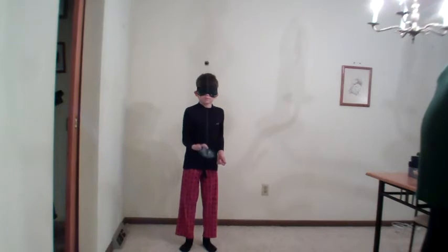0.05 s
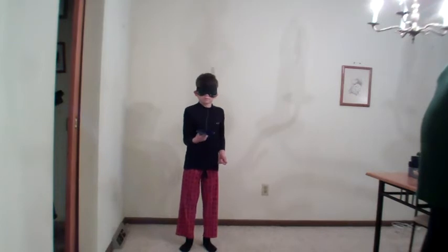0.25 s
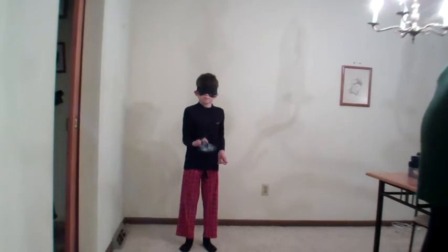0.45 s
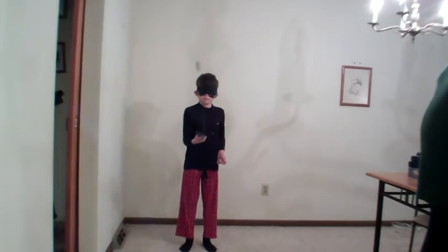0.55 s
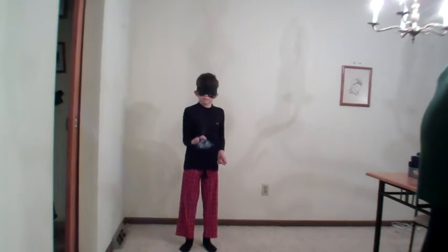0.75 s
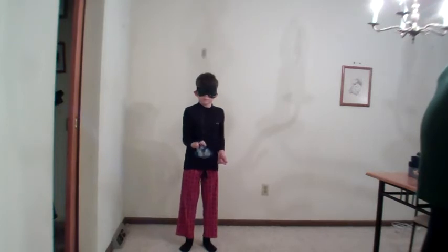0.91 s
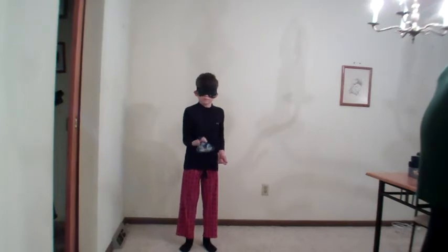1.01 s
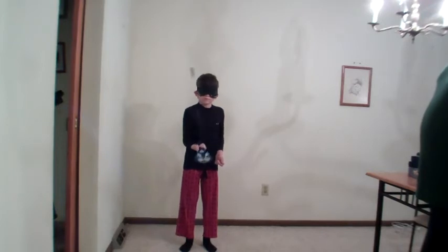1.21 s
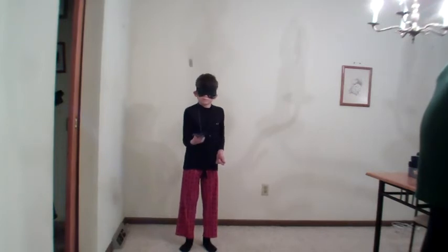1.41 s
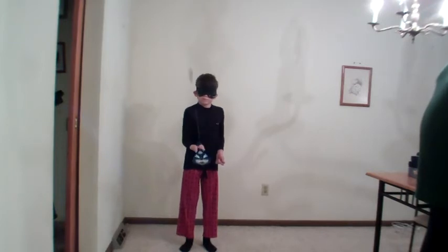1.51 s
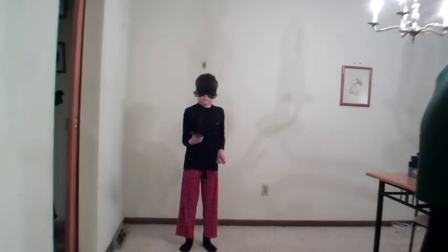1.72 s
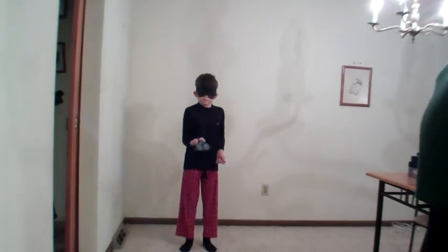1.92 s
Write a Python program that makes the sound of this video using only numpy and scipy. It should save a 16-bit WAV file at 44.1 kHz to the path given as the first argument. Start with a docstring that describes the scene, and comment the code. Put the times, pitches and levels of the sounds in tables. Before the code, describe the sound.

A wooden paddle bats a small rubber ball on an elastic six times in a quick, even rhythm. Each sharp knock follows a faint swish and echoes briefly in a quiet, bare room, heard from a few metres away.

```python
"""Paddle ball in a bare room

A few metres away, a wooden paddle bats a small rubber ball on an elastic up again and again.
Each knock is a sharp click plus a short ring of the blade; nearby surfaces echo it and the room rings on.
Paddle and elastic swish softly through the air ahead of every blow, over faint room noise."""
import sys
import numpy as np
from scipy import signal
from scipy.fft import rfft, irfft
from scipy.io import wavfile

SR = 44100
rng = np.random.default_rng(int(sys.argv[2]) if len(sys.argv) > 2 else 0)


def put_to_file(sound):
    """Save the sound as 16-bit audio at rate SR, in the file named by the first command-line argument."""
    columns = np.atleast_2d(sound).T  # one column per channel
    safe = np.clip(columns, -1, 1)
    whole_steps = np.round(safe * 32767)
    wavfile.write(sys.argv[1], SR, whole_steps.astype(np.int16))


N = 85995
SIZE = 92160  # samples behind each spectrum: the scene plus some spare
FREQ = np.arange(SIZE // 2 + 1) * SR / SIZE
TIME = np.arange(N) / SR

# The tone of the ball touching wood. Each row: frequency in Hz, relative level in dB.
CLICK_TONE = [(60, -35), (200, -21.5), (520, -6.5), (800, -17.5), (1400, -9.5), (2150, -9.5), (3100, -6),
              (4500, -6), (7000, -7), (10000, -7.5), (11500, -16.5), (13000, -28), (14300, -41),
              (15800, -49)]


def knocks():
    """One spectrum per blow: the ball clicks, rings the blade and pushes a little air in a low thump."""
    # Each row: start in seconds, click, ring and thump levels in dB, brightness in dB per octave,
    # pitch ratio of the ring, then pitch in Hz and level in dB of the crack (a high ring set by the spot hit).
    blows = [(0.2351, -7, 5.5, -35, 0.3, 0.982, 5100, -12), (0.515, -3.5, 0.5, -8, -0.65, 1.01, 3050, -12),
             (0.7948, -2.5, -4.5, -24, 0.45, 1.015, 2555, -5),
             (1.07915, -3, -3.5, -16.5, 1.3, 1.01, 5650, -9), (1.3723, 1, -4, -21, -1.2, 0.963, 4190, -1.5),
             (1.657, -3, -1.5, -8, -0.3, 1, 4640, -5.5)]
    # The blade's own notes. Each row: base pitch in Hz, level in dB, seconds to fade by 60 dB.
    blade_notes = [(432, -29, 0.046), (573, 3, 0.016), (1004, -4, 0.018), (1225, 1, 0.015),
                   (1457, -3.5, 0.022), (1592, -5, 0.033), (2800, -23.5, 0.012), (3740, -17.5, 0.0092)]
    crack_fade_s, thump_hz, thump_fade_s, ring_top_hz = 0.01, 139, 0.0053, 9900
    click = curve(CLICK_TONE)
    octaves = np.log2(np.maximum(FREQ, 1000) / 4000)
    spreads_db = 1.2 * rng.standard_normal((len(blows), len(blade_notes)))  # no two blows ring alike
    spectra = []
    for blow, spread_db in zip(blows, spreads_db):
        start, click_db, ring_db, thump_db, tilt_db, pitch, crack_hz, crack_db = blow
        notes = [(hz, db + ring_db + extra, t60) for (hz, db, t60), extra in zip(blade_notes, spread_db)]
        ring = ringing(notes, pitch)
        ring += ringing([(crack_hz, crack_db, crack_fade_s), (thump_hz, thump_db, thump_fade_s)])
        ring /= 1 + (FREQ / ring_top_hz) ** 16  # the blade gives off little above this
        contact = sharp_filter(click + click_db + tilt_db * octaves)
        spectra.append((contact + ring) * delay(start))
    return spectra


def room_echoes(count):
    """The room's answer to each blow: fixed echoes and rings, plus a wash that changes as the paddle moves."""
    # The direct sound and first echoes. Each row: delay in ms, left and right levels in dB,
    # extra delay on the right in ms.
    paths = [(0, 1, 0.5, 0.0033), (.68, 0.5, 1, 0.025), (3.68, -.5, -1.5, 0.0087), (4.15, -6, -8.5, 0.015),
             (8.8, -8.5, -17, 0.03)]
    # The room's own notes. Each row: pitch in Hz, level in dB, seconds to fade by 60 dB.
    room_notes = [(292.3, -3.5, 0.66), (400.7, 11.5, 0.22), (501, 1.5, 0.72), (620, -7, 0.66),
                  (1128, -7, 0.5), (1255, 8.5, 0.2), (1407, 3, 0.45), (1523, 11.5, 0.057)]
    # The wash of late echoes. Each row: frequency in Hz, level in dB, seconds to fade by 60 dB,
    # how alike left and right are from 0 to 1.
    wash_bands = [(81.4, -16.5, 0.39, 1), (250, 8, 0.2, 1), (500, -2.5, 0.23, 0.92), (830, -3.5, 0.3, 0.97),
                  (1210, 2, 0.26, 0.78), (2200, -1, 0.29, 0.54), (5100, -2.5, 0.29, 0.3),
                  (9000, -4.5, 0.24, 0.1), (13100, -11, 0.23, 0.15)]
    build_s, tail_samples = 0.0046, 16384
    scatter_db, scatter_above_hz = 1, 1050  # furniture close by scatters only the treble
    early = sum(np.array([undb(left_db) * delay(ms / 1000), undb(right_db) * delay((ms + lag) / 1000)])
                for ms, left_db, right_db, lag in paths)
    steady = early + ringing(room_notes) * delay(build_s)
    alike = curve(wash_bands, column=3)
    treble = FREQ ** 2 / (FREQ ** 2 + scatter_above_hz ** 2)
    scatter = irfft(noise_pair(alike) * treble) * undb(scatter_db)
    wash = noise_pair(alike) * undb(curve(wash_bands))
    bands = []
    for hz, _, t60, _ in wash_bands:
        this_band = curve([(row[0], row[0] == hz) for row in wash_bands])
        bands.append((irfft(wash * this_band), fade(tail_samples, t60, build_s)))
    answers = []
    for start in rng.integers(0, SIZE - tail_samples, count):
        part = slice(start, start + tail_samples)
        near = scatter[:, part] * fade(tail_samples, t60=0.043, build_s=0.002)
        tail = sum(band[:, part] * envelope for band, envelope in bands)
        answers.append(steady + rfft(near, SIZE) + rfft(tail, SIZE) * delay(build_s))
    return answers


def grazes():
    """A thin zip as ball or elastic brushes the blade just before a blow."""
    # Each row: start in seconds, peak level in dB.
    brushes = [(0.2321, -30.5), (0.511, -53)]
    pitch_hz, width_hz, rise_s, fall_s = 4950, 600, 0.0004, 0.0036
    zip_noise = noise(hump_db(pitch_hz, width_hz) / 2 + curve(CLICK_TONE))
    return zip_noise * sum(undb(db) * swell(start + rise_s, rise_s, fall_s) for start, db in brushes)


def swings():
    """Air swishes round the paddle and hisses on the elastic as ball and blade close in."""
    # Each row: fastest moment in seconds, swish level in dB, hiss level in dB, swish rise in seconds.
    strokes = [(-.02, -70.5, -58.5, 0.05), (0.191, -55.5, -58, 0.034), (0.472, -56.5, -58, .075),
               (0.757, -58, -61, 0.06), (1.032, -59, -59, 0.051), (1.332, -60, -62, 0.034),
               (1.612, -58, -59, 0.058), (1.945, -56, -59.5, 0.082)]
    # The tone of the paddle's swish and the elastic's hiss. Each row: frequency in Hz, relative level in dB.
    swish_tone = [(50, -16), (110, -8.5), (160, 2.5), (280, -11.5), (400, -1), (480, -4), (650, -1),
                  (900, -7), (1400, -16.5), (2500, -18), (8000, -66)]
    hiss_tone = [(200, -3.5), (700, -5), (1400, 3.5), (2100, -2.5), (3200, -2), (4800, -1.5), (7000, -7.5),
                 (10000, -11), (13000, -32), (16000, -46)]
    swish = sum(undb(db) * swell(peak, rise, fall_s=0.079) for peak, db, _, rise in strokes)
    hiss = sum(undb(db) * swell(peak, 1.3 * rise, fall_s=0.077) for peak, _, db, rise in strokes)
    return swish * noise(curve(swish_tone)) + hiss * noise(curve(hiss_tone))


def background():
    """Faint room noise with a low rumble."""
    # The tone of the room noise. Each row: frequency in Hz, relative level in dB.
    air_tone = [(25, -14), (60, -12), (100, -10), (160, 2), (250, -2.5), (600, 0.5), (1300, 2), (2300, -15),
                (4800, -10), (9500, -23), (12000, -38), (15000, -61)]
    air_db, rumble_db = -70.5, -79.5
    rumble = noise(hump_db(hz=54, width_hz=9.9))
    return undb(air_db) * noise(curve(air_tone)) + undb(rumble_db) * rumble


def undb(db):
    """Turn decibels into a number to multiply by."""
    return 10 ** (np.asarray(db) / 20)


def curve(rows, column=1):
    """Join the dots of one table column to get a value at every frequency."""
    points = np.array(rows, float)
    return np.interp(np.log(FREQ + 1), np.log(points[:, 0]), points[:, column])


def hump_db(hz, width_hz):
    """Levels in dB that peak at one frequency and fall away on both sides."""
    return -20 * np.log10(1 + ((FREQ - hz) / width_hz) ** 2)


def sharp_filter(db):
    """A filter with these levels and the sharpest possible start."""
    cepstrum = irfft(np.log(undb(db)))
    cepstrum[1:SIZE // 2] *= 2  # move all that comes before time zero to after it
    cepstrum[SIZE // 2 + 1:] = 0
    return np.exp(rfft(cepstrum))


def delay(seconds):
    """Multiply a spectrum by this to make its sound come later."""
    return np.exp(-2j * np.pi * FREQ * seconds)


def ringing(notes, pitch=1):
    """The spectrum of struck notes, each fading by 60 dB in t60 seconds."""
    s = 2j * np.pi * FREQ
    total = 0
    for hz, db, t60 in notes:
        width = 2 * np.log(1000) / t60
        total = total + undb(db) * width * s / (s * s + width * s + (2 * np.pi * hz * pitch) ** 2)
    return total


def noise_pair(alike):
    """Spectra of left and right white noise, from unrelated (0) to the same (1)."""
    mid, side = rfft(rng.standard_normal((2, SIZE)))
    alike = np.clip(alike, 0, 1)
    return (mid * np.sqrt(1 + alike) + side * np.sqrt(1 - alike) * np.array([[1], [-1]])) / np.sqrt(2)


def noise(tone_db, alike_below_hz=2310):
    """Stereo noise of strength 1 with this tone; left and right are alike in the bass."""
    alike = 1 / (1 + (FREQ / alike_below_hz) ** 2)
    sound = irfft(noise_pair(alike) * undb(tone_db))[:, :N]
    return sound / sound.std()


def fade(samples, t60, build_s):
    """A loudness shape that builds up and dies away, with a total energy of 1."""
    t = TIME[:samples]
    shape = (1 - np.exp(-t / build_s)) * np.exp(-np.log(1000) * t / t60)
    return shape / np.sqrt(np.sum(shape ** 2))


def swell(peak_s, rise_s, fall_s):
    """A bell-shaped rise and fall around one moment."""
    return np.exp(-.5 * ((TIME - peak_s) / np.where(TIME < peak_s, rise_s, fall_s)) ** 2)


def scene():
    """Knocks in the room, grazes, swishes and background, all duller on the right."""
    # What the right side loses, mostly treble. Each row: frequency in Hz, level change in dB.
    right_shade = [(100, -5), (500, -1.5), (1300, -1.2), (3000, -3), (5500, -4.5), (8500, -9.5),
                   (10300, -7), (11800, 1.5), (15000, -30)]
    blows = knocks()
    in_room = sum(blow * echoes for blow, echoes in zip(blows, room_echoes(len(blows))))
    left, right = in_room + rfft(grazes() + swings() + background(), SIZE)
    right = right * sharp_filter(curve(right_shade))
    return irfft(np.array([left, right]))[:, :N]


def record(dry):
    """The microphone delays the treble a touch; the recorder cuts the very highest sounds."""
    lag_hz, lag_width_hz, top_hz = 7500, 7000, 15800
    lag = lag_hz ** 2 - FREQ ** 2 + 1j * FREQ * lag_width_hz
    heard = irfft(rfft(dry, SIZE) * np.conj(lag) / lag)[:, :N]  # shifts timing, not levels
    return signal.sosfilt(signal.ellip(8, .2, 70, top_hz, fs=SR, output="sos"), heard)


dry = scene()
out = record(dry)
put_to_file(out)
```